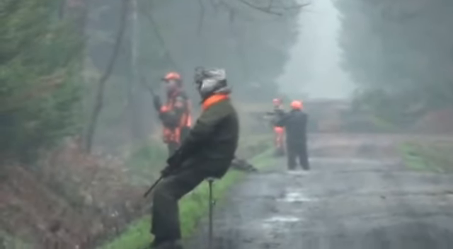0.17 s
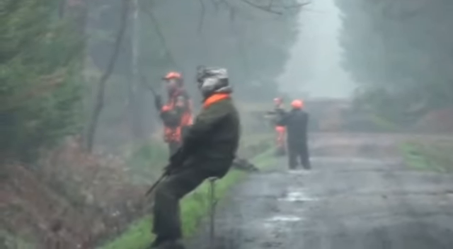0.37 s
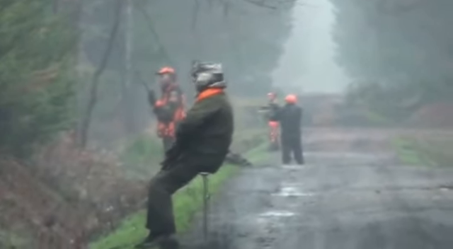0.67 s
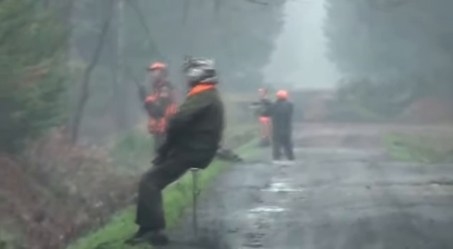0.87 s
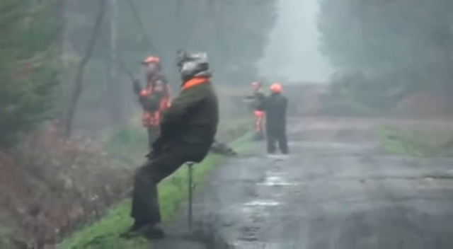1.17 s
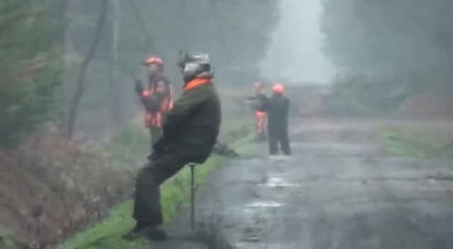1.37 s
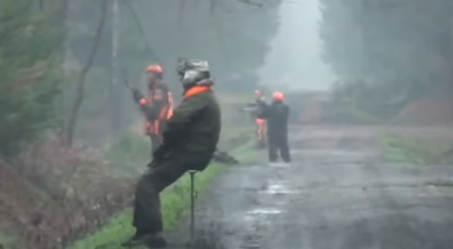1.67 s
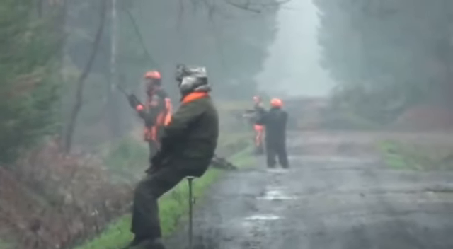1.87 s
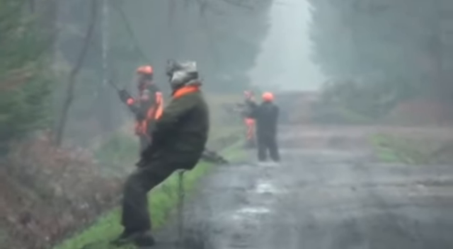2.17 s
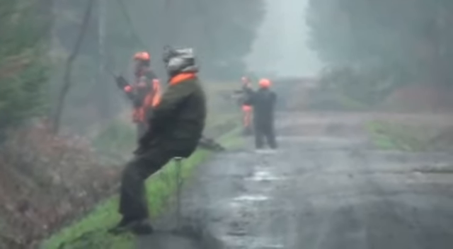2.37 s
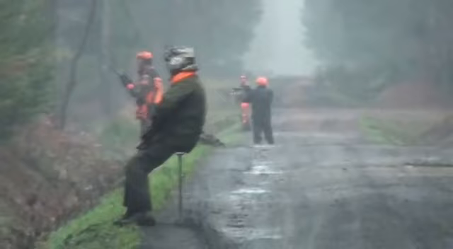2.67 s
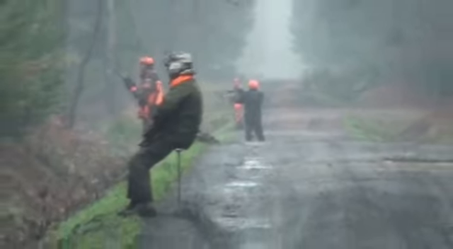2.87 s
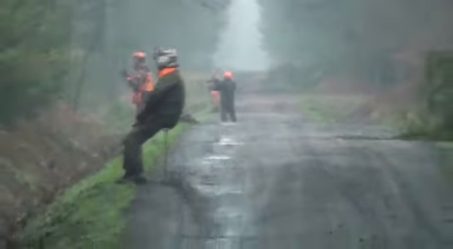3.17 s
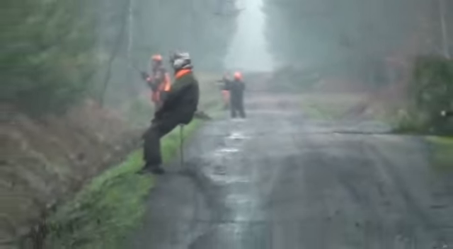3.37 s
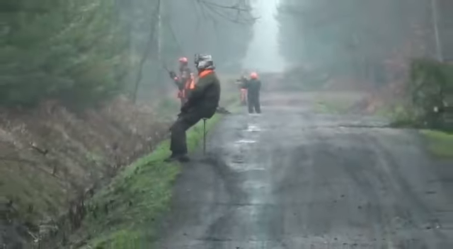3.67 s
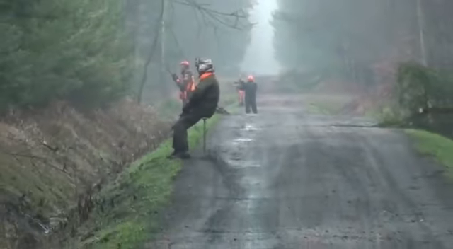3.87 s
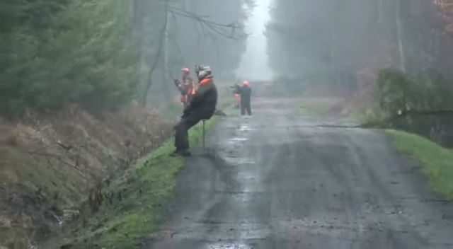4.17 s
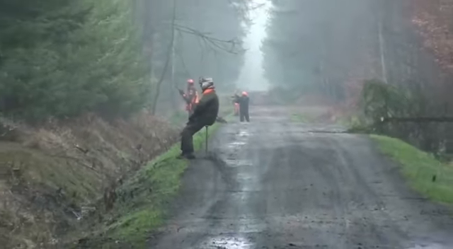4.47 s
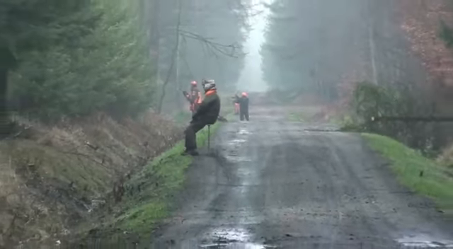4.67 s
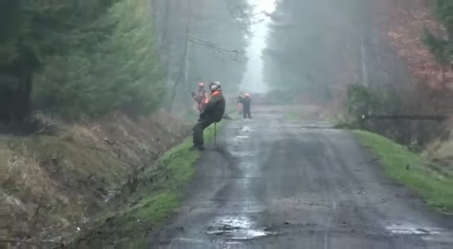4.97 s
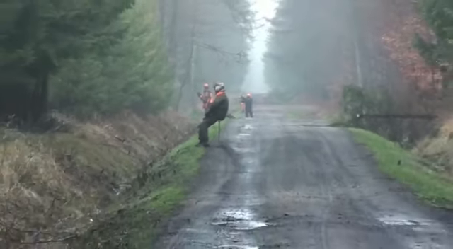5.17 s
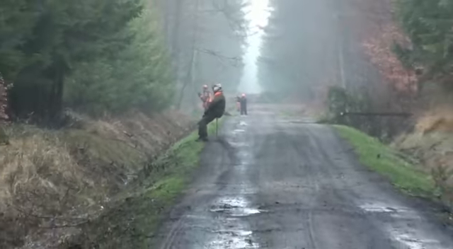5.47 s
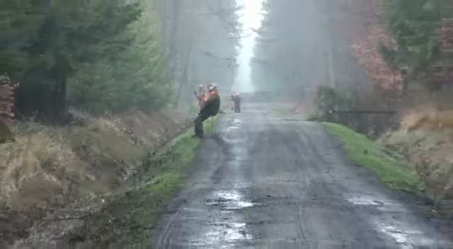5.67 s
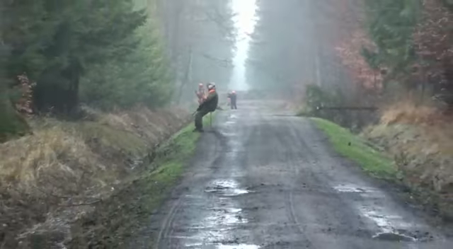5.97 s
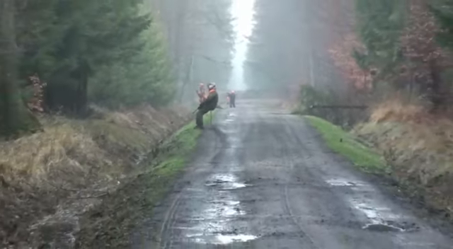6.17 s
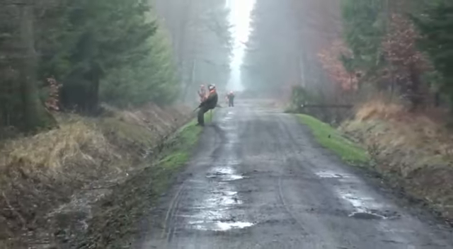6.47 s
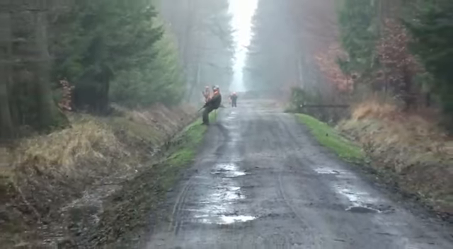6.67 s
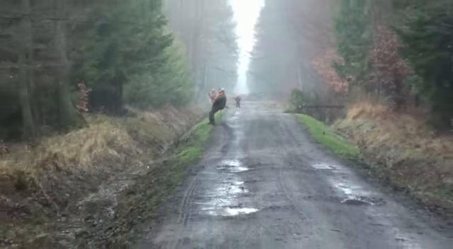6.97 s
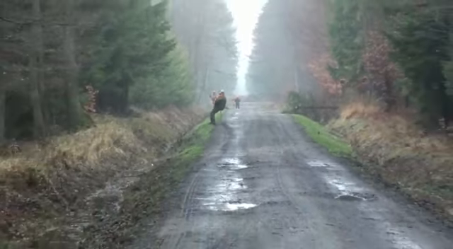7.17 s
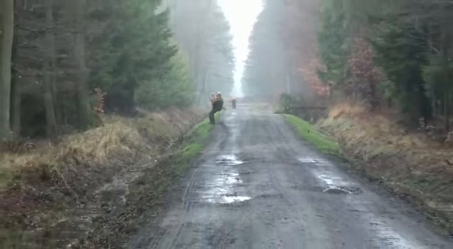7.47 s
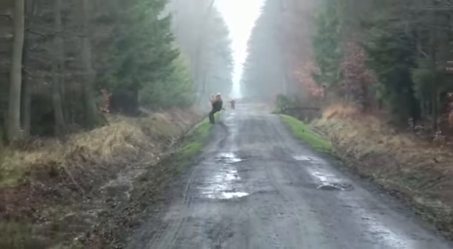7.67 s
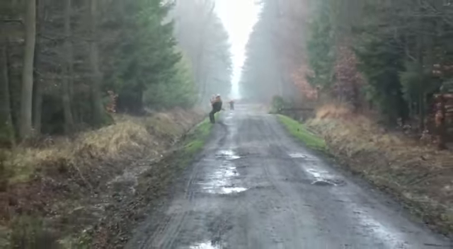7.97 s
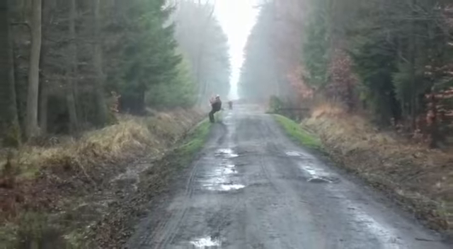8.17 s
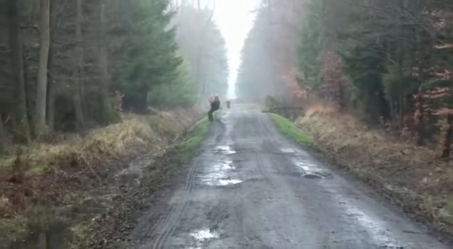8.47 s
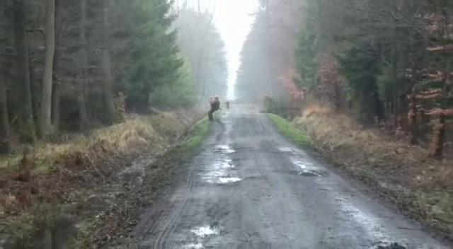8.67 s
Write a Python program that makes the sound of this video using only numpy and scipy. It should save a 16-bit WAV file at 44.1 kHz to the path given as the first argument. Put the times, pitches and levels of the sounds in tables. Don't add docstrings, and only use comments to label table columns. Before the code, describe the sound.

Quiet woodland ambience heard through a camera's built-in microphone: soft hiss, low motor hum, blurred distant chirps and husky hound cries. Zooming brings a click, a fluttering electronic whine and dry close ticks. Late on, a single loud gunshot breaks the wait, followed by a dense reverberant roar with a few distinct echoes, losing treble first while the motor whine drops lower.

```python
import sys
import numpy as np
from scipy import signal
from scipy.fft import rfft, irfft
from scipy.io import wavfile
from scipy.ndimage import uniform_filter1d

SR = 44100
rng = np.random.default_rng(int(sys.argv[2]) if len(sys.argv) > 2 else 0)


def to_wav(s):
    ch = np.atleast_2d(s).T
    pcm = np.round(np.clip(ch, -1, 1) * 32767)
    wavfile.write(sys.argv[1], SR, pcm.astype(np.int16))


def volts(x):
    e = np.asarray(x, float) / 20
    return 10 ** e


N = 388521
T = np.arange(N) / SR
FREQ = np.maximum(np.fft.rfftfreq(N, 1 / SR), 1)
SIDES = np.array([[1], [-1]])
SHOT_S = 6.7021
FIELD_HZ = 50


def on_log(table, hz, axis=1):
    rows = np.array(table)
    return np.interp(np.log(hz), np.log(rows[:, 0]), rows[:, axis])


def set_rms(x, db):
    return x * volts(db) / np.sqrt(np.mean(x ** 2))


def walk(rate_hz):
    hold = int(SR / rate_hz)
    steps = np.repeat(rng.standard_normal(N // hold + 1), hold)
    return set_rms(uniform_filter1d(steps, hold)[:N], 0)


def add(out, s, grain):
    i = int(round(s * SR))
    out[max(i, 0):i + len(grain)] += grain[max(-i, 0):N - i]


def hiss():
    # (frequency [Hz], density [dB per Hz])
    hiss_spectrum = [(20, -32), (45, -16.5), (80, -10.5), (150, -13.5), (450, -12.5), (820, -14),
                     (1300, -17), (2400, -20), (3600, -20.5), (4600, -21), (6500, -21.5), (10000, -24),
                     (15750, -24.5), (15850, -60)]
    # (frequency [Hz], side minus mid [dB])
    hiss_width = [(60, -23), (110, -16), (200, -7), (380, -4), (700, -2), (1290, -1), (2380, -3.5),
                  (4400, -6.5), (8120, -11.5), (15000, -21)]
    mid, side = rfft(rng.standard_normal((2, N))) * volts(on_log(hiss_spectrum, FREQ))
    pair = irfft(mid + SIDES * side * volts(on_log(hiss_width, FREQ)), N)
    return set_rms(pair, -57) * volts(0.24 * walk(9.5))


def drive():
    # (time [s], level [dB])
    load = [(0, -69), (1.1, -71), (1.25, -65), (4.7, -64.5), (5.15, -73.5), (5.7, -73), (6.1, -71),
            (6.7, -70), (8.81, -74.5)]
    # (frequency [Hz], level [dB rms])
    whine_lines = [(840, -75.5), (2524.3, -67), (7499, -80.5)]
    hum_hz, hum_width_hz, waver_db = 71.3, 4.8, 1.5
    resonance = 1 / (1 + ((FREQ - hum_hz) / hum_width_hz) ** 2)
    hum = set_rms(irfft(rfft(rng.standard_normal(N)) * resonance, N), 0)
    hum = set_rms(hum + 4.0 * np.sin(2 * np.pi * hum_hz * T), 0)
    hum_db = np.interp(T, *np.transpose(load)) + waver_db * walk(5.9)
    whines = 0
    for hz, db in whine_lines:
        whines = whines + np.sqrt(2) * volts(db + 1.0 * walk(20)) * np.sin(2 * np.pi * hz * T)
    return hum * volts(hum_db) + whines


def glide(length, hz0, hz1, jitter, db, softness):
    size = int(length * SR)
    hz = np.linspace(hz0, hz1, size) + jitter[:size]
    swell = np.hanning(size) ** (softness / 2)
    return volts(db) * swell * np.sin(2 * np.pi * np.cumsum(hz) / SR)


def far_calls():
    # (time [s], length [s], start [Hz], end [Hz], level [dB])
    notes_heard = [
        (1.1, .5, 575, 590, -72),
        (1.65, .5, 585, 600, -72),
        (1.965, .09, 1950, 2290, -66),
        (2.04, .12, 2295, 2280, -69.5),
        (2.1, .1, 2200, 2000, -66),
        (2.17, .18, 2020, 2000, -67.5),
        (2.42, .27, 2070, 2010, -68),
        (3.12, .55, 670, 680, -76.5),
        (3.58, .25, 1755, 1750, -76.5),
        (4.5, .65, 1690, 1700, -79),
    ]
    # (time [s], length [s], pitch [Hz], rasp [Hz], level [dB])
    cries = [(-.3, .45, 1160, 120, -73), (.76, .14, 1900, 700, -72), (1.4, .15, 3500, 1500, -73),
             (2.27, .12, 2575, 450, -67), (2.28, .3, 2250, 200, -70), (2.7, .85, 2200, 180, -73),
             (3.6, .6, 2125, 220, -74.5), (5.3, .7, 1075, 350, -73), (6, .7, 620, 300, -72),
             (6.15, .3, 1160, 80, -70), (6.45, .3, 1190, 80, -71), (6.1, .5, 3000, 900, -76)]
    note_rasp = .02
    woods_t60_s = 1.66
    lead = 1
    dry, jitter = np.zeros(N + SR), walk(300)
    for s, length, hz0, hz1, db in notes_heard:
        shake = note_rasp * hz0 * jitter[int((s + 1) * SR):]
        add(dry, s + lead, glide(length, hz0, hz1, shake, db, 0.52))
    for s, length, hz, rasp_hz, db in cries:
        shake = rasp_hz * jitter[int((s + 1.5) * SR):]
        add(dry, s + lead, glide(length, hz, hz, shake, db, 0.38))
    mid, side = rng.standard_normal((2, 2 * SR)) * volts(-60 * T[:2 * SR] / woods_t60_s)
    woods = (mid + 0.24 * SIDES * side) * volts(-26)
    woods[:, 0] += .8
    return signal.fftconvolve(dry[None], woods, axes=1)[:, SR:SR + N]


def tick(hz):
    t, peak_s = T[:900], 0.0032
    return np.e * t / peak_s * np.exp(-t / peak_s) * np.sin(2 * np.pi * hz * t)


def ticks():
    gear_hz = (3870, 4060, 4790, 5020, 6400)
    # (time [s], peak [dB])
    low_teeth = [(3.9299, -50), (3.9723, -54), (4.4108, -54), (4.5894, -49.5), (4.7381, -58), (4.9496, -52),
                 (5.2295, -56), (5.3093, -54), (5.3891, -50), (5.4879, -53)]
    second_teeth = [(3.2215, -53), (4.0102, -53), (4.4368, -55), (4.5166, -52), (5.0284, -55)]
    third_teeth = [(2.7316, -52), (2.78, -50), (3.893, -54), (4.3594, -55), (5.0693, -50), (5.1492, -55),
                   (5.5971, -53)]
    high_teeth = [(3.8087, -52), (4.0881, -50), (4.2811, -54), (4.8299, -49), (4.9895, -53), (5.3502, -53),
                  (5.7473, -54), (6.0686, -52), (6.1514, -51), (7.9498, -50), (8.0292, -51), (8.3704, -54),
                  (8.3993, -57), (8.4277, -55), (8.4512, -53), (8.5285, -52), (8.6073, -57)]
    focus_teeth = [(.5626, -55), (.7437, -57), (1.4416, -51), (1.706, -57), (2.4234, -55), (2.5765, -50)]
    # (time [s], peak [dB], ring [Hz], bandwidth [Hz])
    clicks = [
        (2.577, -39, 4300, 830),
        (2.5765, -52, 7500, 3000),
        (2.6025, -44, 4300, 900),
        (5.1118, -36, 6900, 3000),
        (5.1118, -46, 4000, 1980),
    ]
    patter_per_s, patter_hz, patter_start_s, patter_db = 130, (3800, 4950), 2.65, -71
    out, patter, t = np.zeros(N), np.zeros(N), T[:900]
    even_run = [(6.2871 + k * .08, -51) for k in range(4)]
    gears = (low_teeth, second_teeth, third_teeth, high_teeth + even_run, focus_teeth)
    for hz, teeth in zip(gear_hz, gears):
        for s, db in teeth:
            add(out, s, volts(db - 4) * tick(hz * (1 + .008 * rng.standard_normal())))
    for when, size, gear, detune in rng.random((int(patter_per_s * N / SR), 4)):
        hz = patter_hz[int(2 * gear)] * (.93 + .14 * detune)
        add(patter, when * N / SR, volts(-10 * size) * tick(hz))
    for s, db, hz, width_hz in clicks:
        ring = np.exp(-np.pi * width_hz * t / 2) * np.sin(2 * np.pi * hz * t)
        add(out, s, volts(db) * ring)
    return out + set_rms(patter, patter_db) * (T > patter_start_s)


def lens_motor():
    # (start [s], end [s], step rate from [Hz], to [Hz], level over the long move [dB])
    moves = [
        (2.6, 2.68, 5780, 5780, -5),
        (2.685, 2.79, 4710, 4750, 2),
        (2.79, 2.96, 4950, 6050, -1),
        (2.96, 3.11, 6150, 7250, -3),
        (3.11, 3.16, 7300, 8350, -9),
        (3.16, 3.56, 8440, 8440, -2.5),
        (3.595, 3.635, 6300, 7900, -4),
        (3.655, 7.93, 5410, 5410, 0),
        (7.935, 8.81, 3835, 3835, 6),
    ]
    # (time [s], swing [Hz], rise [s], fall [s])
    hunts = [(2.86, 170, .07, .12), (3.68, 170, .1, .14), (3.88, 200, .06, .08), (4.09, 210, .1, .1),
             (4.2, 100, .1, .6), (4.66, 220, .45, .16), (5.11, 210, .28, .11), (5.54, 200, .14, .08),
             (5.62, 90, .05, .14), (5.95, 100, .2, .6), (6.55, 200, .6, .9), (7.5, 100, .8, 1.5),
             (7.94, 165, .005, 30)]
    motor_db, calm_swing_hz = -68.5, 45
    shell_hz, shell_width_hz, shell_peak_db = 5680, 210, 7.5
    field = np.floor(T * FIELD_HZ) / FIELD_HZ
    hz, gain = np.zeros(N), np.zeros(N)
    for s0, s1, hz0, hz1, db in moves:
        on = (T > s0) * (T < s1)
        hz = np.where(on, np.interp(field, [s0, s1], [hz0, hz1]), hz)
        gain = np.where(on, volts(motor_db + db), gain)
    swings = [np.interp(field, [s - rise, s, s + fall], [0, deep, 0]) for s, deep, rise, fall in hunts]
    swing_hz = np.maximum(np.max(swings, axis=0), calm_swing_hz)
    kick = np.clip(.2 + 2.2 * np.sin(2 * np.pi * FIELD_HZ * T), -1, 1)
    hz = hz + swing_hz * kick + 12 * walk(150)
    shell_db = shell_peak_db / (1 + ((hz - shell_hz) / shell_width_hz) ** 2)
    flutter_db = shell_db + 2.2 * walk(70) + 1.5 * np.sin(2 * np.pi * FIELD_HZ * T + 1)
    tone = np.sqrt(2) * np.sin(2 * np.pi * np.cumsum(hz) / SR)
    return uniform_filter1d(gain, size=200) * volts(flutter_db) * tone


def blast(ms, top_hz):
    t = np.arange(900) / SR / (ms / 1000)
    wave = (1 - t) * np.exp(-.5 * t)
    wave = signal.lfilter([-.78, 1], [1, -.78], wave)
    band = signal.butter(3, [390, top_hz], "bandpass", fs=SR, output="sos")
    wave = signal.sosfilt(band, wave)
    return wave / wave.max()


def echoes():
    # (time [s], peak [dB], blast length [ms])
    arrivals = [(6.7021, -.8, .5), (6.7041, -9, .45), (6.7068, -12, .3), (6.7105, -5, .32),
                (6.7122, -10, .5), (6.7162, -7.5, .6), (6.7179, -8, .5), (6.7226, -9, .35), (7.33, -12, .8),
                (8.111, -20, .7), (8.572, -23.5, .8)]
    # (time [s], length [s], pitch [Hz], level [dB])
    slopes = [
        (6.901, 0.61, 78.3, -45),
        (7.948, 0.48, 58, -56),
    ]
    thump_hz, thump_db, thump_t60_s = 132, -21, 0.076
    bright_db, bright_s, bright_hz = -43, .0022, 6500
    out, t = np.zeros(N), T[:SR // 4]
    for s, db, ms in arrivals:
        top_hz = 4600 / (1 + 1.6 * (s - SHOT_S))
        add(out, s, volts(db) * blast(ms, top_hz))
    thump = volts(thump_db - 60 * t / thump_t60_s) * np.sin(2 * np.pi * thump_hz * t)
    add(out, SHOT_S, thump * np.minimum(t * thump_hz, 1))
    for s, length, hz, db in slopes:
        add(out, s, glide(length, hz, .9 * hz, 6 * walk(15.5), db, 2))
    mid, side = rng.standard_normal((2, N)) * np.exp(-((T - SHOT_S) / bright_s) ** 2)
    highpass = signal.butter(2, bright_hz, "highpass", fs=SR, output="sos")
    bright = signal.sosfilt(highpass, mid + .7 * SIDES * side)
    return out * volts(-.4 * SIDES) + volts(bright_db) * bright


def scatter():
    # (frequency [Hz], density at the shot [dB per Hz], extra loss in wet air and needles [dB per s])
    scatter_colour = [(30, -41, 4), (70, -13, 16), (112, -16, 8), (199, -16.5, 0.5), (317, -8.5, -0.5),
                      (547, 0.5, -1), (890, -5.5, 1.5), (1490, -6.5, 5.5), (2450, -9.5, 10.5),
                      (3990, -14.5, 22), (5600, -23.5, 31), (7270, -24.5, 46), (9470, -38, 87),
                      (13000, -50, 155)]
    # (frequency [Hz], side minus mid [dB])
    scatter_width = [(60, -32), (110, -34), (200, -27), (380, -22), (700, -16.5), (1290, -14.5),
                     (2380, -14), (4400, -12.5), (8120, -13), (15000, -29)]
    # (frequency [Hz], left minus right [dB])
    scatter_lean = [(100, 0), (200, -.5), (400, -1), (750, -1), (1300, -.4), (2400, 0)]
    trunks_per_s, trunk_spread_db, clump_db = 9000, 1.5, .7
    start_db, burst_db, burst_s = -19.5, 0.5, 0.037
    near_sag_db_per_s, far_sag_db_per_s, near_ends_s = 3, 6.5, 0.85
    start = int(SHOT_S * SR)
    size = N - start
    age = np.arange(size) / SR
    hz = np.maximum(np.fft.rfftfreq(size, 1 / SR), 1)
    draw = rng.random((2, 3, size))
    sizes = np.sign(draw[:, 1] - .5) * volts(-trunk_spread_db * np.log(1 - draw[:, 2]))
    hits = (draw[:, 0] < trunks_per_s / SR) * sizes
    colour = volts(on_log(scatter_colour, hz))
    colour /= np.sqrt(np.mean(colour ** 2 * (hz > 350) * (hz < 900)))
    mid, side = rfft(set_rms(hits, 0)) * colour * [hz ** 0, volts(on_log(scatter_width, hz))]
    pair = (mid + SIDES * side) * volts(SIDES * on_log(scatter_lean, hz) / 2)
    out = 0
    for centre in 22 * 2 ** np.arange(0, 10, .5):
        band = np.cos(np.pi * np.clip(np.log2(hz / centre), -.5, .5)) ** 2
        build = np.clip(age * centre / 16, .3, 1)
        loss_db = on_log(scatter_colour, centre, axis=2) * age ** 0.82
        out = out + build * irfft(pair * band, size) * volts(-loss_db)
    roll_db = start_db + burst_db * np.exp(-age / burst_s) - near_sag_db_per_s * age
    roll_db -= far_sag_db_per_s * np.maximum(age - near_ends_s, 0)
    roll_db += clump_db * walk(45.25)[:size]
    return np.pad(out * volts(roll_db), ((0, 0), (start, 0)))


def scene():
    rise_db, rise_s = 3, 0.32
    duck_db, duck_s = -5, .04
    age = np.maximum(T - SHOT_S, 0)
    gain_db = rise_db * (1 - np.exp(-age / rise_s))
    gain_db += duck_db * (age > 0) * np.exp(-age / duck_s)
    camera = hiss() + drive() + ticks() + lens_motor()
    return far_calls() + echoes() + scatter() + volts(gain_db) * camera


def top_cut(x):
    return signal.sosfilt(signal.butter(12, 16650, fs=SR, output="sos"), x)


def record(dry):
    rounded = np.tanh(0.59 * dry) / 0.61
    lowpass = signal.ellip(10, .1, 70, 15800, fs=SR, output="sos")
    return top_cut(signal.sosfilt(lowpass, rounded))


dry = scene()
out = record(dry)
to_wav(out)
```